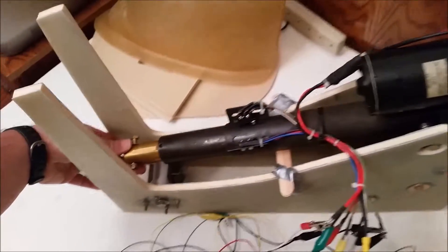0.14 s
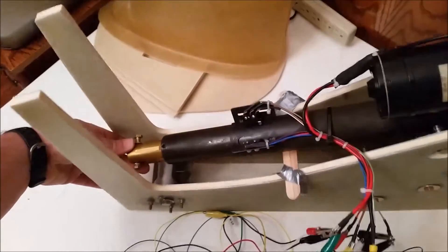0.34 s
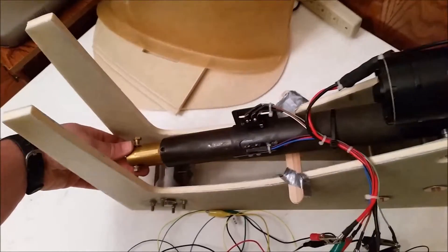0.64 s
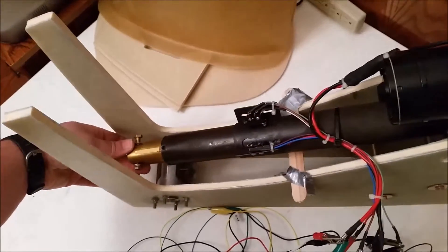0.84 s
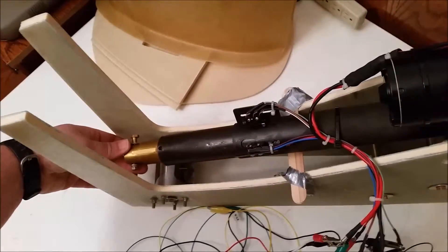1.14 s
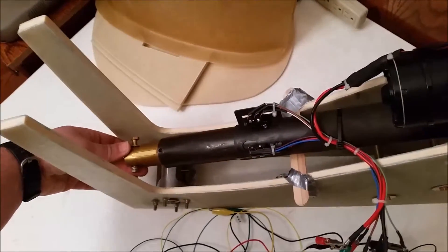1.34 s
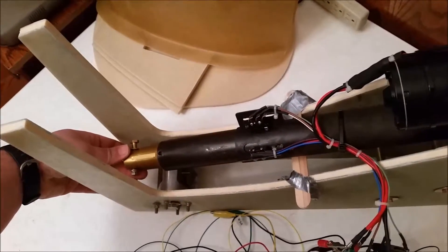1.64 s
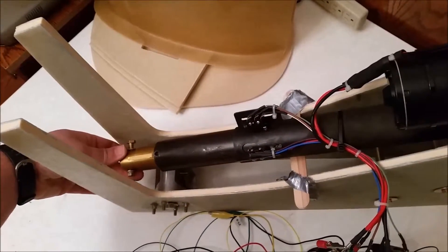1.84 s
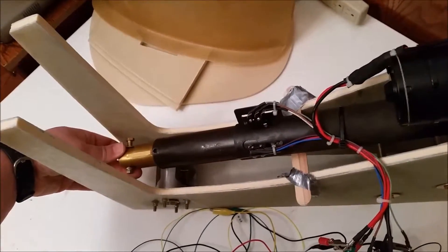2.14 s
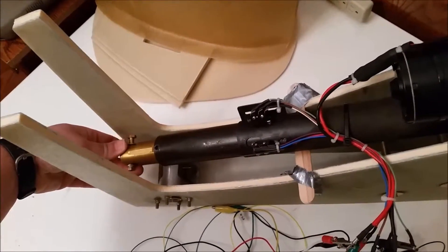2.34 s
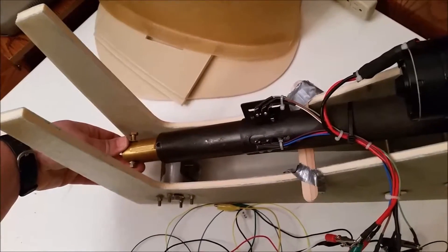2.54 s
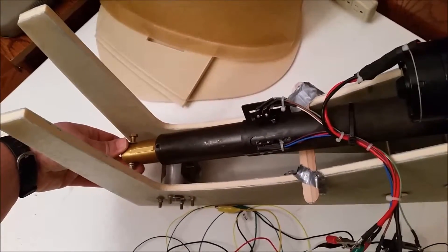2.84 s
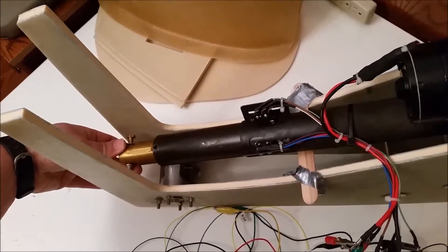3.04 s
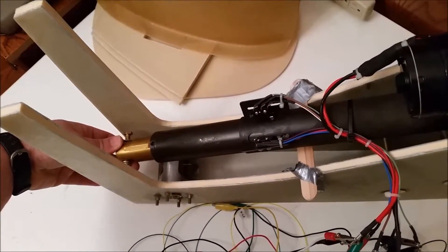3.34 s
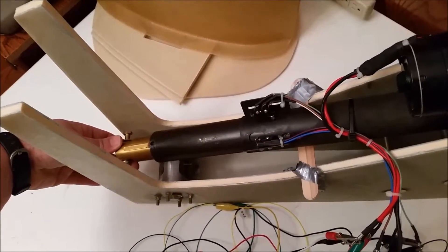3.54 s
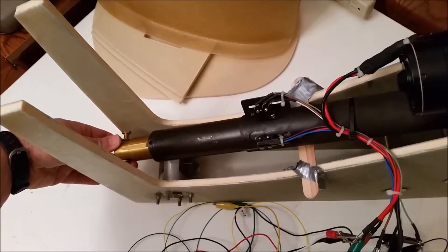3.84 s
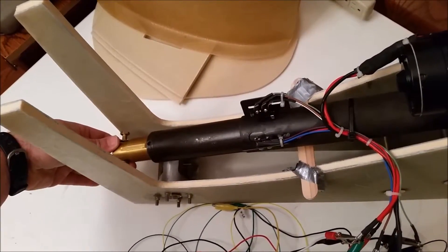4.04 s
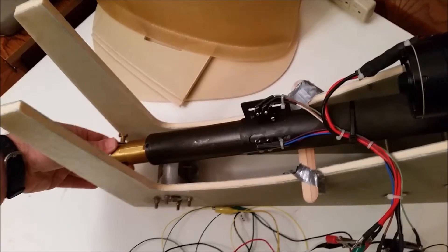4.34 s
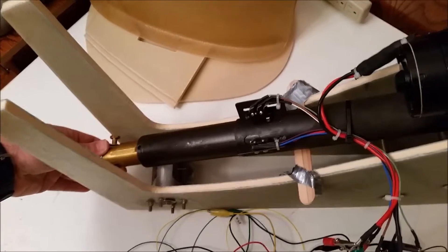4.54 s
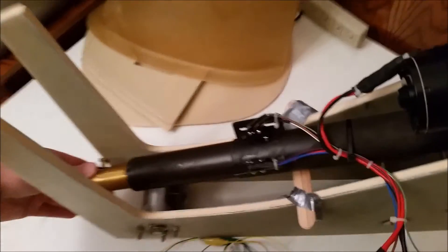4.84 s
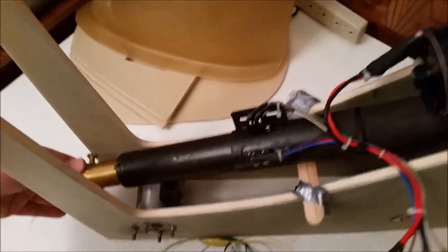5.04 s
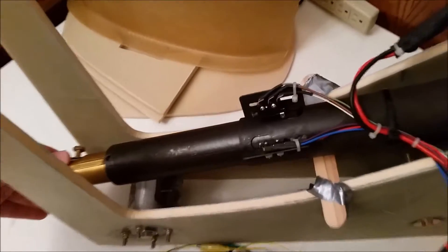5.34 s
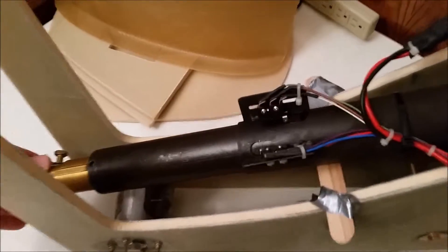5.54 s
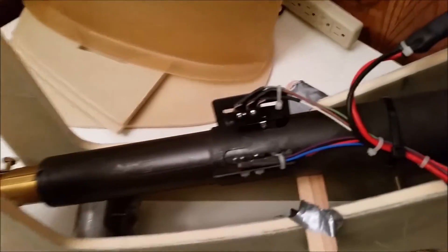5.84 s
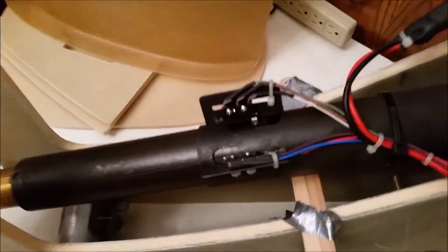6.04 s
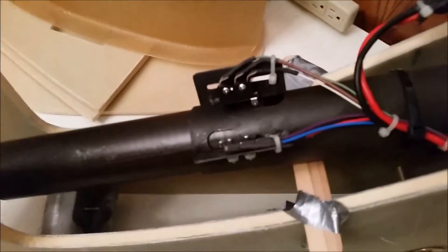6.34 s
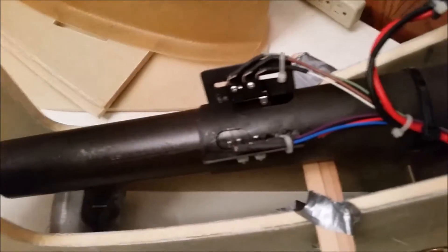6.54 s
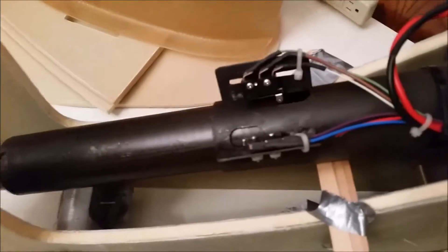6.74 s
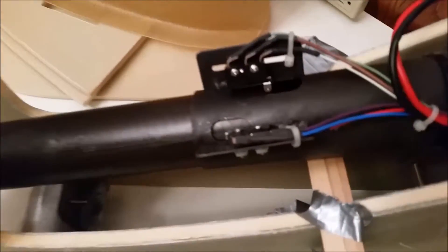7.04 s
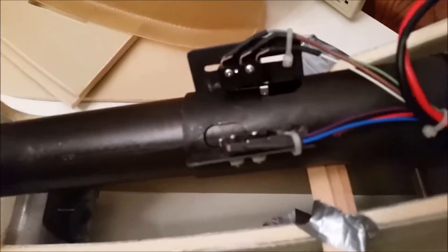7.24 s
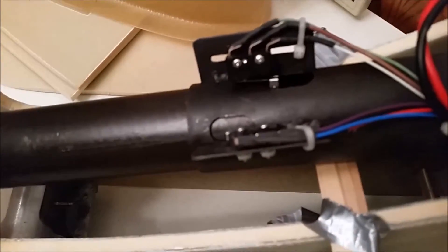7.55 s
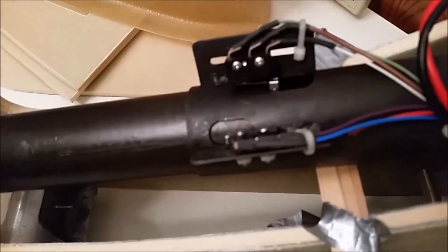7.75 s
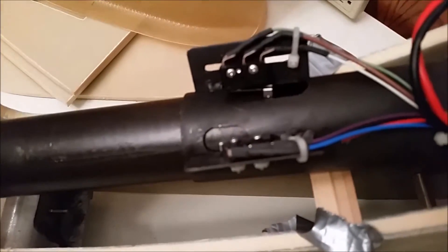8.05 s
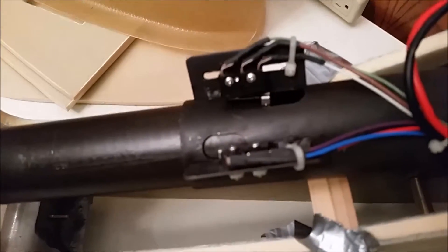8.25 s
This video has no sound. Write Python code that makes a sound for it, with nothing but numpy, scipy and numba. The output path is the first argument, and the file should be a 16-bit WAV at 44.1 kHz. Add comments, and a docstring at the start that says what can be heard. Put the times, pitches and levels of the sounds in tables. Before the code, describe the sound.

From 0 seconds a small brushed motor is already running at constant speed, driving a screw actuator on a bench in a small room. Its whine sits near 830 Hz with a strong octave near 1670 Hz, wavering about ten times a second and swelling gently every 0.7 seconds. Beneath are a low hum and drone; around it, uneven gear-tooth rattle, ringing housing and a broad, gritty brush rasp with a sizzle near 10 to 11 kHz. The load eases around 2.5 seconds and rises again near 4.7. From 4.7 to 5.4 the stereo microphone moves in: the sizzle grows, mostly right, and the throb deepens. It lightens around 6.5, then strengthens. At about 7.4 power is cut; pitch plunges and gears jolt dully for a tenth of a second. A short room tail dies into faint, left-leaning hiss and low rumble until about 8.4.

```python
"""A wavering whine with a rattle and a rasp: a small brushed motor drives a screw actuator on a workbench.
Its ten slots sing a tone and octave that waver with each gear turn; the tone also swells with each screw turn.
Teeth knock the housing into ringing, brushes scratch the commutator bars; a two-port microphone moves in.
The power is cut, the rotor brakes in about a tenth of a second, and the small room dies away to a faint hiss."""
import sys
import numpy as np
from scipy import signal
from scipy.fft import rfft, irfft, next_fast_len
from scipy.io import wavfile
from numba import njit

SR = 44100
rng = np.random.default_rng(int(sys.argv[2]) if len(sys.argv) > 2 else 0)


def materialize(psi):
    """Save the field psi as 16-bit PCM at rate SR to the path in sys.argv[1].

    A 1-D psi becomes a single channel; in a 2-D psi each row is a channel.
    """
    bounded = np.clip(np.atleast_2d(psi).T, -1, 1)
    quanta = np.round(bounded * 32767).astype(np.int16)
    wavfile.write(sys.argv[1], SR, quanta)


N = 369558
TIME = np.arange(N) / SR  # s

SHAFT_HZ, GEAR_RATIO, SLOTS = 83.43, 8.5, 10
CUT_S, BRAKE_S, SPARK_S = 7.384, .118, .016  # power cut; time to rest; time for the sparks to die
# microphone moving in: (time [s], closeness [0-1])
APPROACH = [(4.7, 0), (5.4, 0.83)]


def undb(db):
    """Decibels to amplitude."""
    return 10 ** (np.asarray(db) / 20)


def unit(x):
    """Scale to rms 1."""
    return x / np.sqrt(np.mean(x ** 2))


def curves(table):
    """Columns of a timed table, interpolated per sample."""
    time_s, *columns = np.transpose(table)
    return [np.interp(TIME, time_s, column) for column in columns]


def walk(rate_hz):
    """Smooth random wander of spread near 1, with rate_hz knots a second."""
    knots = rng.standard_normal(16384)
    return 1.2 * np.interp(TIME * min(rate_hz, 1900), np.arange(len(knots)), knots)


def ring(x, hz, width_hz):
    """One fixed resonance, gain 1 at its centre."""
    b, a = signal.iirpeak(min(hz, SR * 9 / 20), hz / width_hz, fs=SR)
    return signal.lfilter(b, a, x)


@njit
def moving_ring(x, hz, width_hz):
    """One resonance whose centre and width move, gain 1 at the centre (state-variable filter)."""
    y, band, low = np.empty(len(x)), 0., 0.
    for i in range(len(x)):
        g = np.tan(np.pi * hz[i] / SR)
        k = width_hz[i] / hz[i]
        v = (band + g * (x[i] - low)) / (1 + g * (g + k))
        band = 2 * v - band
        low = low + 2 * g * v
        y[i] = k * v
    return y


def colour(x, table):
    """Filter two channels by a (frequency [Hz], left [dB], right [dB]) spectrum on a log-frequency axis."""
    hz, *sides_db = np.transpose(table)
    size = next_fast_len(N, True)
    log_f = np.log(np.arange(size // 2 + 1) * SR / size + 1)
    gain = undb([np.interp(log_f, np.log(hz), side_db) for side_db in sides_db])
    return irfft(rfft(x, size) * gain, size)[:, :N]


def ports(wave, left_db, right_db, lag_rad):
    """A complex tone at both ports; the left one hears it lag_rad later."""
    left = undb(left_db) * (wave * np.exp(-1j * lag_rad)).imag
    right = undb(right_db) * wave.imag
    return np.array([left, right])


def room(x, wet_db, t60_low_s=0.47, t60_high_s=0.31, split_hz=2500):
    """Direct sound plus a diffuse tail whose treble dies sooner."""
    t = np.arange(SR // 2) / SR
    noise = rng.standard_normal((2, len(t)))
    low = signal.sosfilt(signal.butter(2, split_hz, fs=SR, output="sos"), noise)
    tail = low * 1000 ** (-t / t60_low_s) + (noise - low) * 1000 ** (-t / t60_high_s)
    tail *= t > .004  # tail starts after 4 ms
    tail *= undb(wet_db) / np.sqrt(np.sum(1000 ** (-2 * t / t60_low_s)))
    return x + signal.fftconvolve(x, tail, axes=1)[:, :N]


def standing(x):
    """Narrow room modes build up once the walls return the sound, and ring on afterwards."""
    # room modes: (centre [Hz], width [Hz], level from afar [dB], level close up [dB])
    room_modes = [(438, 8, -1, 4), (834, 6.5, 1, -6.5), (1678, 8, -9, -11)]
    wall_lag_s = .02997
    close, = curves(APPROACH)
    returned = np.array([np.interp(TIME - wall_lag_s, TIME, port, left=0) for port in x])
    modes = 0
    for hz, width_hz, far_db, near_db in room_modes:
        modes = modes + undb(far_db + close * (near_db - far_db)) * ring(returned, hz, width_hz)
    return x + modes


def background(rumble_hz=70, rumble_db=-59):
    """A faint hiss, mostly on the left, over a low rumble that sinks 12 dB after the cut."""
    # hiss spectrum: (frequency [Hz], left [dB per Hz], right [dB per Hz])
    quiet = [(25, -79.5, -90.5), (79.7, -78, -78), (159.3, -89, -87), (300, -96.5, -94.5), (556, -92, -99),
             (850, -97, -105), (1250, -86.5, -106), (1720, -90.5, -107), (2500, -106, -114),
             (3250, -97, -113), (4100, -82.5, -113), (5030, -96.5, -119), (6140, -113, -128),
             (8000, -130, -131)]
    hiss = colour(rng.standard_normal((2, N)) * np.sqrt(SR / 2), quiet) * undb(.5 * walk(36))
    rumble_band = signal.butter(2, [18, rumble_hz], "band", fs=SR, output="sos")
    rumble = unit(signal.sosfilt(rumble_band, rng.standard_normal(N)))
    return hiss + rumble * undb(rumble_db + np.interp(TIME, [CUT_S, 8], [0, -12]))


def braking(bend=1.3):
    """Share of full speed: steady until the cut, then falling to rest."""
    return np.clip(1 - (TIME - CUT_S) / BRAKE_S, 0, 1) ** bend


def unpowered():
    """0 while the current flows, 1 once it has died."""
    return np.clip((TIME - CUT_S) / SPARK_S, 0, 1)


def effort(db, per_load, screw_db, close_db):
    """A part's level in dB: follows the load, swells once a screw turn, shifts as the microphone nears."""
    # friction along the stroke, scaled by per_load: (time [s], load [dB])
    friction = [(0, 1.5), (.75, 2), (1.45, 1.5), (1.85, -1.5), (2.55, -3), (3.25, -1), (3.85, -2),
                (4.7, 2.5), (5.4, 0), (6.5, -5.5), (7.35, 0.5)]
    screw_s, binds_s = .7, .14  # time of one screw turn; moment it binds hardest
    screw = np.cos(2 * np.pi * (TIME - binds_s) / screw_s)
    return db + per_load * curves(friction)[0] + screw_db * screw + close_db * curves(APPROACH)[0]


def over_turn(gear):
    """Speed change and relative swells at each gear angle in turns, in the order of the table's columns."""
    # one gear turn: (share of the turn [0-1], speed change [%], whine [dB], octave from afar [dB],
    #                 octave close up [dB], brushes [dB]); swells relative, scaled where used
    gear_turn = [(.07, 0, 2.5, 1.5, 1, 2.3), (.21, .5, -2, 4.5, 1, -.3), (.3, 1.6, -7, -1, -4.5, -2.8),
                 (.44, .2, -8, 2.5, 4.5, -.2), (.53, 1.4, -5, -6, 0, -.4), (.63, .3, -1, -5, -4.5, -1.1),
                 (.77, -1, 1, -4.5, -1.5, -2.3), (.88, -1.8, 4.2, 1, 2.5, 2.4)]
    share, *columns = np.transpose(gear_turn)
    return [np.interp(gear, share, column, period=1) for column in columns]


def rotor(speed, flutter=.002, gear_start_turns=.125):
    """Shaft and gear angles in turns; the gear binds and frees once a turn, so the shaft speed wavers."""
    gear = gear_start_turns + np.cumsum(speed) * SHAFT_HZ / GEAR_RATIO / SR
    waver = over_turn(gear)[0] / 100
    waver = waver - np.average(waver, weights=speed)
    hz = SHAFT_HZ * speed * (1 + waver + flutter * walk(30))
    return np.cumsum(hz) / SR, gear


def brushes(turns, gear, drive, bar_db=1.0, shaft_db=-1.1, grit_db=1.0, catch_db=0.9,
            rasp_surge=1.36, sizzle_surge=.75, spit_share=1.2, narrowing=.25, unpowered_db=-20):
    """Brushes scratch over each commutator bar; the grit rasps broadly and rings the brush holder."""
    # rasp spectrum, relative: (frequency [Hz], left [dB], right [dB])
    rasp_spectrum = [(1550, -9, -4.5), (2880, 2, 0.5), (3400, -1, -14), (5800, 0, -8.5), (7550, 0.5, -5.5),
                     (8600, 2.5, -8), (10720, -3.5, -17), (12450, -6.5, -6.5), (15800, -8.5, 2)]
    # holder resonances, levels relative: (starting centre [Hz], width [Hz], from afar [dB], close up [dB])
    holder_modes = [(9450, 2100, -12.5, -7.5), (10616, 1550, 4.5, 4), (11210, 870, 0.5, -9),
                    (13090, 900, 0.5, -3.5), (15330, 1400, -2, -1)]
    # drift of the holder's main ring, scales all its modes: (time [s], centre [Hz])
    holder_drift = [(4.7, 10800), (5.4, 10720), (5.95, 10570), (6.55, 10620), (7.3, 10460)]
    rasp_db = effort(db=-27.5, per_load=0.47, screw_db=0.53, close_db=-3.0)
    sizzle_db = effort(db=-27.0, per_load=0.36, screw_db=-0.1, close_db=3.5)
    close, = curves(APPROACH)
    centre_hz, = curves(holder_drift)

    bar = (turns * SLOTS).astype(int) % SLOTS
    wear_db = shaft_db * unit(rng.standard_normal(SLOTS))[bar]
    chance_db = grit_db * walk(1200) + catch_db * walk(110)
    bars_db = bar_db * np.cos(2 * np.pi * SLOTS * turns)
    contact = undb(bars_db + wear_db + chance_db + unpowered_db * unpowered())
    scratch = contact * rng.standard_normal((3, N)) * drive

    # the load surges every gear turn; at its height the brushes spit once a shaft turn
    surge_db = over_turn(gear)[4]
    spit = np.cos(np.pi * turns) ** 8 * (1 + .5 * walk(SHAFT_HZ))
    surge_db = surge_db + spit_share * np.maximum(surge_db, 0) * (spit - spit.mean())

    rasp = unit(colour(scratch[:2], rasp_spectrum) * undb(rasp_surge * surge_db)) * undb(rasp_db)
    holder = 0
    for start_hz, full_width_hz, far_db, near_db in holder_modes:
        hz = start_hz * centre_hz / centre_hz[0]
        width_hz = full_width_hz * (1 - narrowing * close)
        rung = moving_ring(moving_ring(scratch[2], hz, width_hz), hz, 2 * width_hz)
        holder = holder + undb(far_db + close * (near_db - far_db)) * rung
    # the holder beams straight at the right port, so it is drier than the rasp
    sizzle = unit(holder * undb(sizzle_surge * surge_db)) * undb(sizzle_db) * undb([[-17], [4.5]])
    return room(rasp, wet_db=-3, t60_high_s=.27) + room(sizzle, wet_db=-7, t60_high_s=.27)


def rattle(turns, drive, clatter, scatter_db=9, scrape=0.94, apart_hz=1900, heavy_hz=600):
    """Teeth knock unevenly and scrape; the housing rings, the same at both ports only in the bass."""
    # housing and bench resonances, levels relative: (centre [Hz], width [Hz], left [dB], right [dB])
    housing = [(112, 25, -5, -3.5), (262.2, 13.4, 6, 1), (289.6, 36, 7.5, 2.5), (360.6, 38, -3.5, 5.5),
               (414.6, 86, 2.5, -8), (782, 69, 4.5, -12.5), (918, 68, -0.5, -1), (1206, 247, -0.5, -14.5),
               (1720, 264, -4.5, 0), (1871, 36, 2.5, 3), (2500, 247, -10.5, -2), (2710, 930, -10.5, -6.5)]
    knocks = np.diff(np.floor(turns * SLOTS), prepend=0)
    uneven = undb(scatter_db * np.tanh(walk(300) / 2))
    force = unit(knocks * rng.standard_normal((2, N)) * uneven)
    force = force + scrape * rng.standard_normal((2, N))
    out = 0
    for hz, table_width_hz, left_db, right_db in housing:
        angle = np.pi / 2 * min(hz / apart_hz, 1)  # ports share less towards the treble
        pair = np.array([force[0], np.cos(angle) * force[0] + np.sin(angle) * force[1]])
        # braking throws the gears across their play, which shakes the heavy, low modes
        pair = pair * (clatter if hz < heavy_hz else drive)
        width_hz = 1.4 * table_width_hz  # two rings in series narrow the peak
        out = out + undb([[left_db], [right_db]]) * ring(ring(pair, hz, width_hz), hz, width_hz)
    knock_db = effort(db=-30.0, per_load=0.59, screw_db=0.9, close_db=0.3)
    return room(unit(out) * undb(knock_db), wet_db=-15.0)


def tone(turns, order, rough_db, slip_rad):
    """One shaft order; play between the teeth shakes its size and timing."""
    phase = 2 * np.pi * (order * turns + rng.random()) + slip_rad * walk(110)
    return np.sqrt(2) * undb(rough_db * walk(60)) * np.exp(1j * phase)


def whine(turns, gear, speed, drive, whine_lead_turns=.15, deepen=0.39, throb=0.85, octave_throb=1.29,
          hum_wander_db=0.5, drone_wander_db=2.0):
    """Imbalance hums, the slots sing with their octave, and weaker gear orders crowd around them."""
    # level of the two main tones; load, screw and distance are added to the whine only:
    # (time [s], whine [dB], octave [dB])
    main_tones = [(0, -23.5, -28.5), (.2, -29, -21.5), (.5, -25.5, -25), (1.5, -23.5, -24), (2.3, -26, -25),
                  (3.4, -26.5, -25), (4.5, -24.5, -23), (5.1, -29, -21), (5.6, -27.5, -26),
                  (6.35, -29.5, -23), (7.35, -24, -27)]
    # weaker tones, relative: (multiple of the shaft speed, rounded in use [-], left [dB], right [dB])
    weak_orders = [(2, -63.5, -50.5), (5, -47, -42), (6, -73, -64), (9, -37.5, -48), (12, -47.5, -55.5),
                   (14, -32, -37), (17, -37.5, -38), (19, -32, -32.5), (21, -62, -32), (22, -44.5, -48.5),
                   (25, -46, -41.5), (28, -63, -41.5), (30, -34.5, -44.5), (40, -36.5, -42.5),
                   (50, -38.5, -51.5), (60, -43.5, -58.5), (69.4, -42, -61.5), (79.5, -39.5, -58),
                   (91.2, -48, -52.5)]
    close, = curves(APPROACH)
    slot_db, octave_db = curves(main_tones)
    hum_db = effort(db=-39, per_load=1.5, screw_db=-0.5, close_db=-0.5) + hum_wander_db * walk(5.5)
    drone_db = effort(db=-36.5, per_load=1.0, screw_db=-0.5, close_db=-4) + drone_wander_db * walk(7)
    slot_db = effort(slot_db, per_load=.05, screw_db=2.5, close_db=2.9)
    # heard from close up, the throb is deeper and falls earlier in the turn
    slot_db = slot_db + throb * over_turn(gear + whine_lead_turns * close)[1] * (1 + deepen * close)
    far_db, near_db = over_turn(gear)[2:4]
    octave_db = octave_db + octave_throb * (far_db + close * (near_db - far_db))

    # without current the rotor shudders in its play and the octave drops 20 dB
    off = unpowered()
    shudder = undb(26 * (1 - speed) - 9 * off) * np.exp(1.1j * off * walk(350))
    slot = tone(turns, order=SLOTS, rough_db=1.4 + 2 * off, slip_rad=.14) * undb(1.0 * walk(12)) * shudder
    octave = tone(turns, order=2 * SLOTS, rough_db=1.1, slip_rad=.13) * undb(-20 * off)
    slots = ports(slot * undb(slot_db), -1.5, -6.0, 0.92) + ports(octave * undb(octave_db), -3.0, 0, 5.5)
    hum = ports(tone(turns, order=1, rough_db=2.0, slip_rad=0.056) * undb(hum_db), -1.5, 1.3, 0)
    drone = ports(tone(turns, order=3, rough_db=3.5, slip_rad=0.19) * undb(drone_db), -0.43, -0.785, 0)

    gears = 0
    for multiple, left_db, right_db in weak_orders:
        order = round(multiple)
        # the same play between the teeth smears high orders more
        wave = tone(turns, order=order, rough_db=3.0, slip_rad=.65 + .008 * order) * undb(1.5 * walk(1.5))
        gears = gears + ports(wave, left_db, right_db, order * 0.218)
    gears = gears * undb(0.6 * over_turn(gear + 0.3)[1] - 1.27 - 0.37 * close - 7.7 * off)
    return (hum + drone + slots) * drive + room(gears * drive, wet_db=-3.5)


def scene(drive_law=1.6, clatter_law=0.63, jolt_db=10):
    """The running actuator in its room, over the background; as it brakes the tones fade and the gears jolt."""
    speed = braking()
    turns, gear = rotor(speed)
    drive = speed ** drive_law
    clatter = speed ** clatter_law * undb(jolt_db * (1 - speed))
    body = standing(whine(turns, gear, speed, drive) + rattle(turns, drive, clatter))
    return body + brushes(turns, gear, drive) + background()


def record(dry, top_hz=15850):
    """The recorder cuts the top steeply."""
    return signal.sosfilt(signal.ellip(12, .2, 90, top_hz, fs=SR, output="sos"), dry)


dry = scene()
out = record(dry)
materialize(out)
```